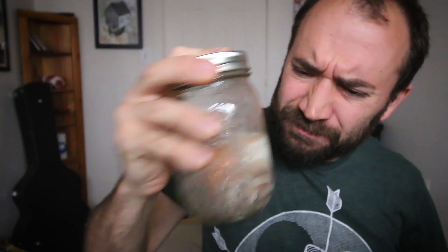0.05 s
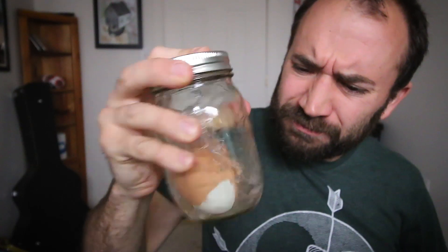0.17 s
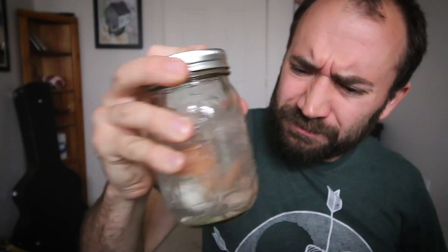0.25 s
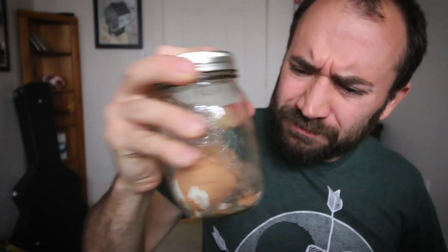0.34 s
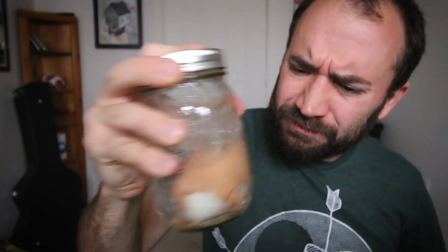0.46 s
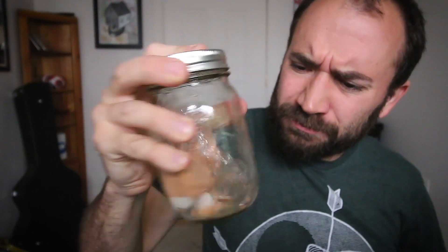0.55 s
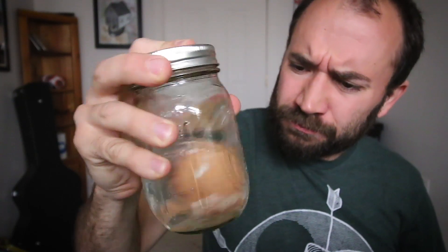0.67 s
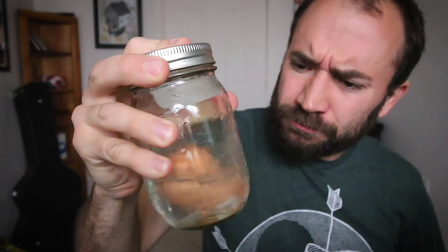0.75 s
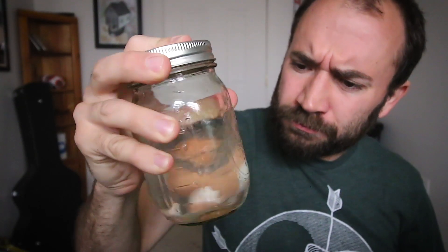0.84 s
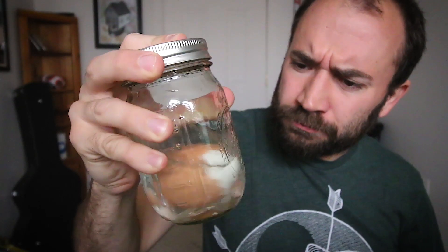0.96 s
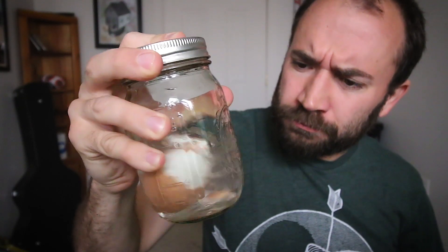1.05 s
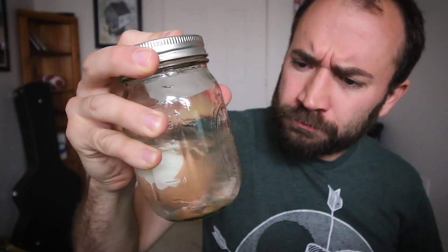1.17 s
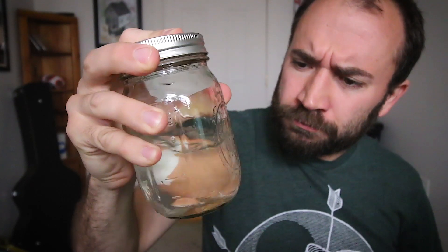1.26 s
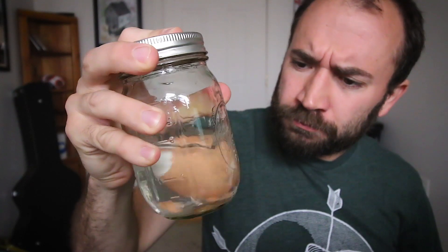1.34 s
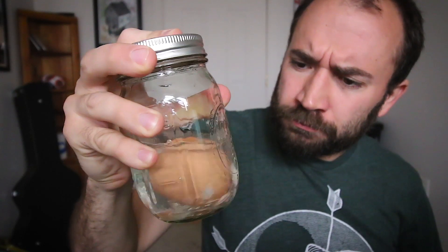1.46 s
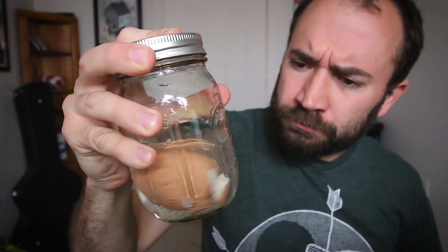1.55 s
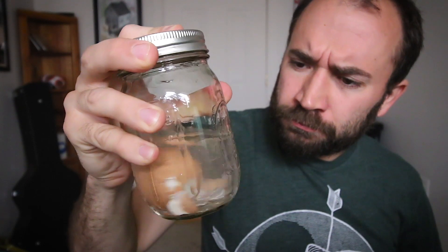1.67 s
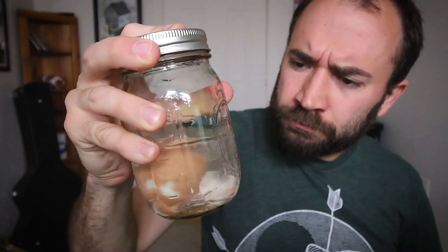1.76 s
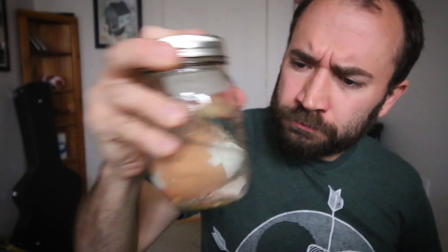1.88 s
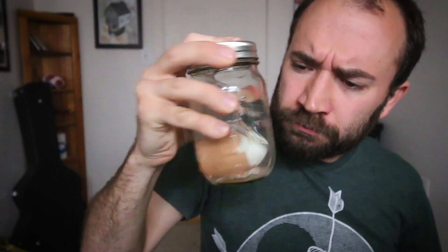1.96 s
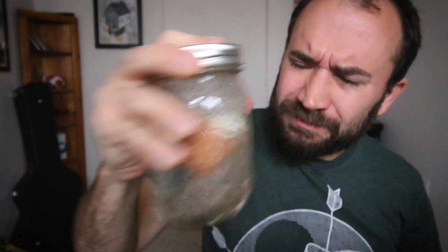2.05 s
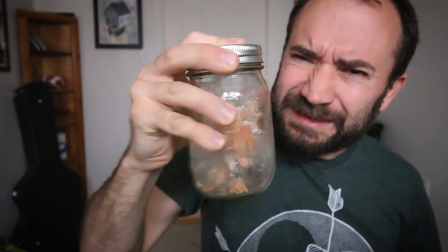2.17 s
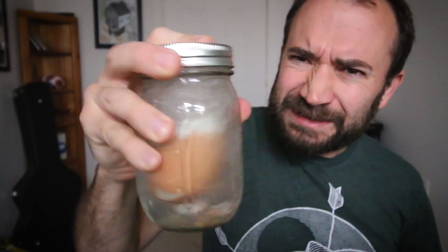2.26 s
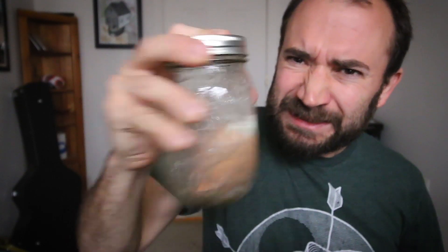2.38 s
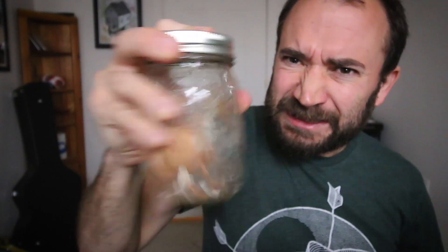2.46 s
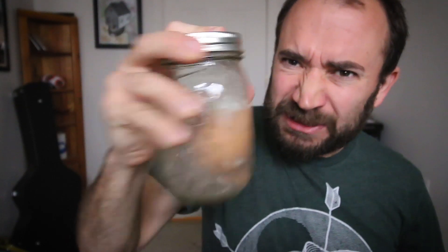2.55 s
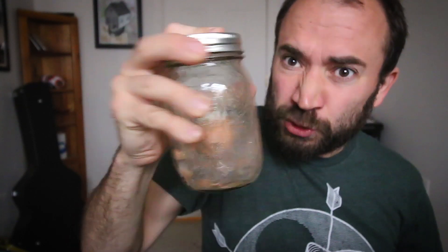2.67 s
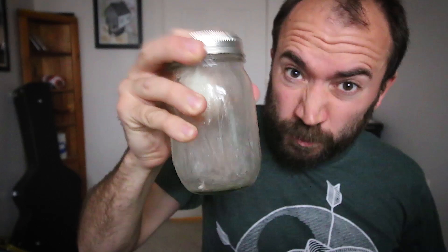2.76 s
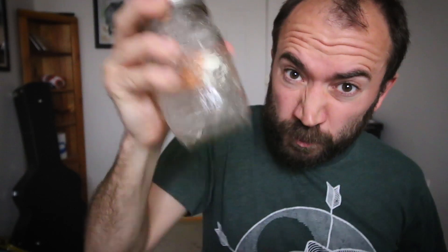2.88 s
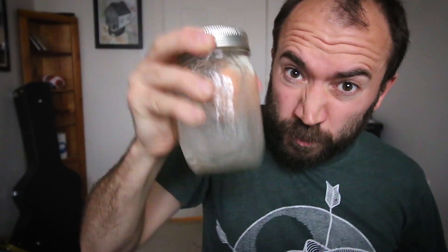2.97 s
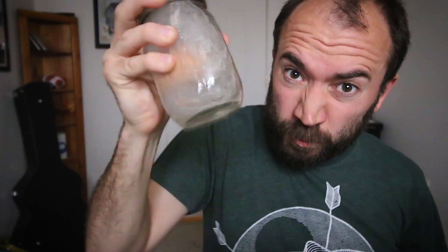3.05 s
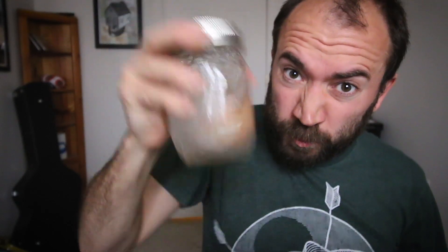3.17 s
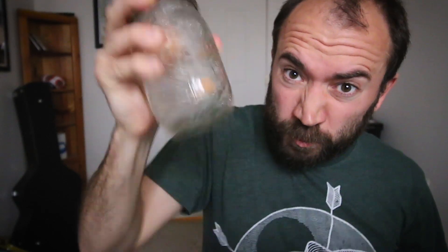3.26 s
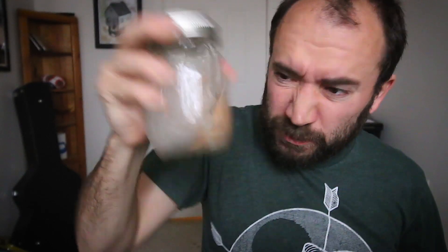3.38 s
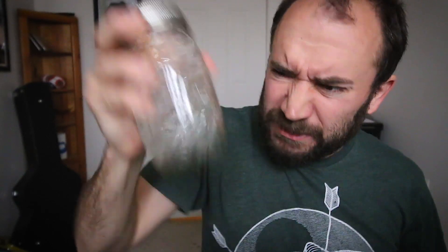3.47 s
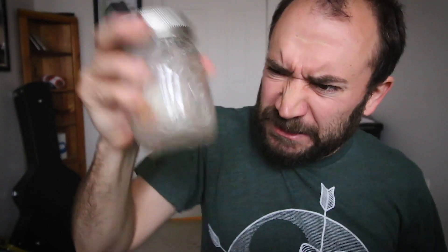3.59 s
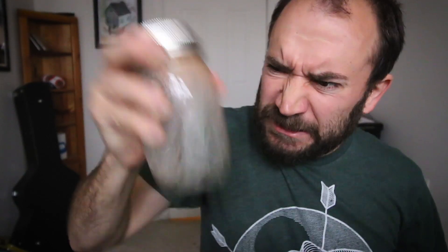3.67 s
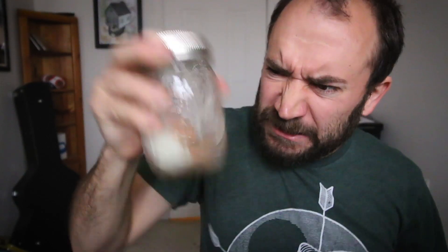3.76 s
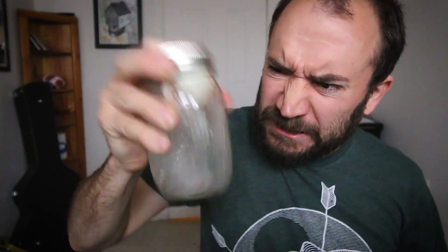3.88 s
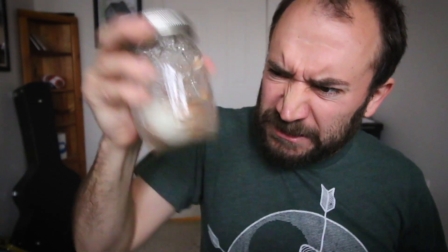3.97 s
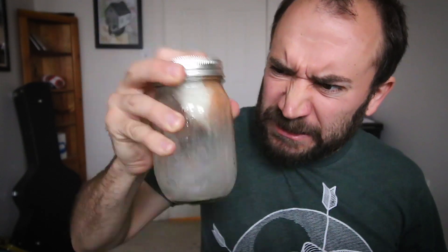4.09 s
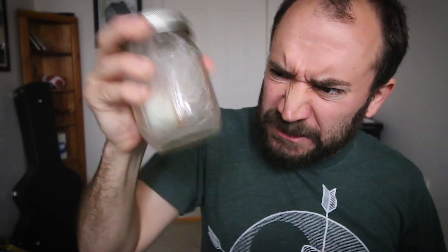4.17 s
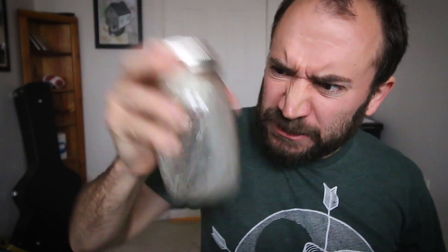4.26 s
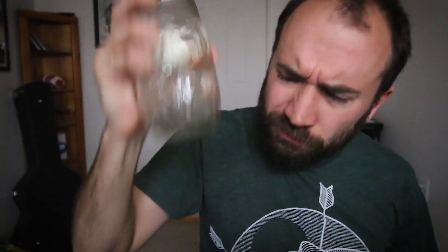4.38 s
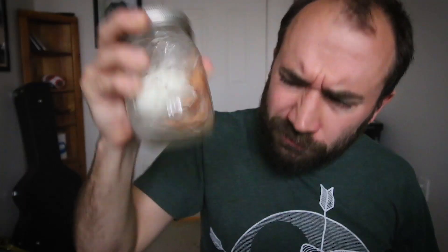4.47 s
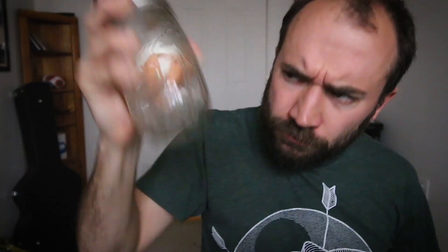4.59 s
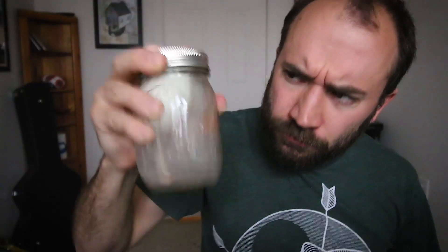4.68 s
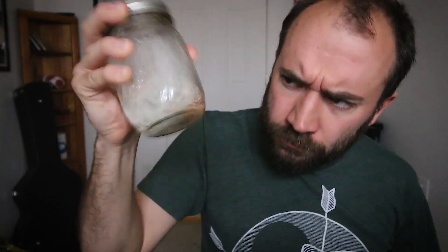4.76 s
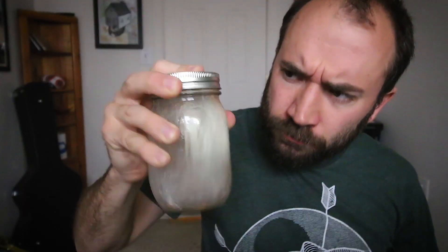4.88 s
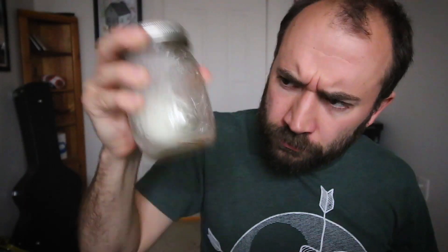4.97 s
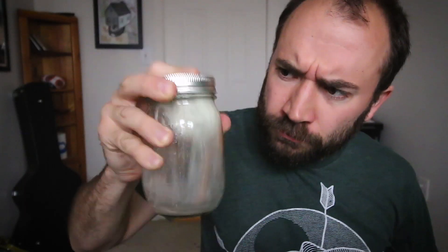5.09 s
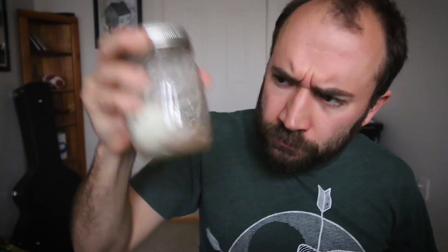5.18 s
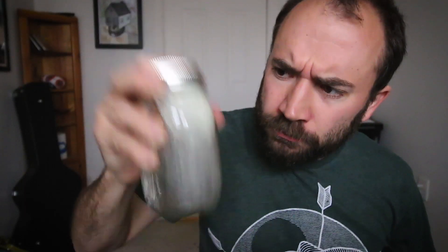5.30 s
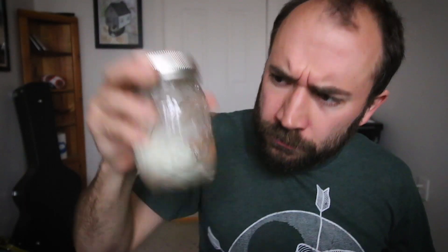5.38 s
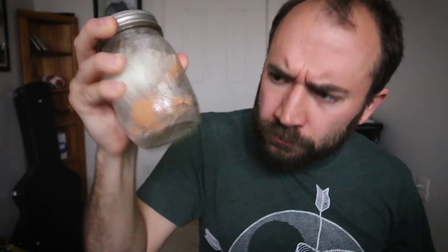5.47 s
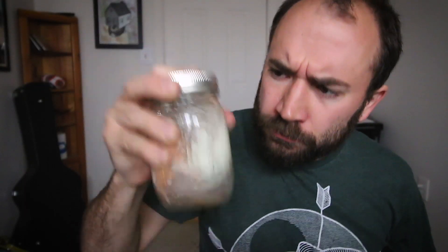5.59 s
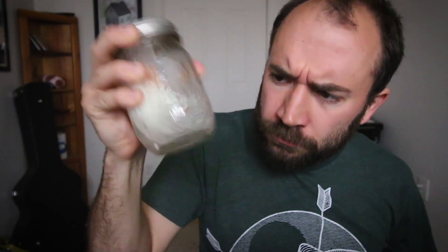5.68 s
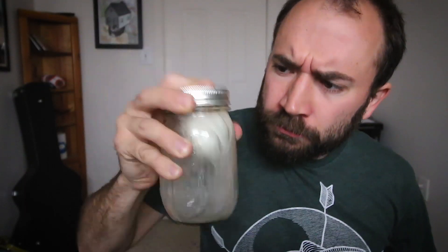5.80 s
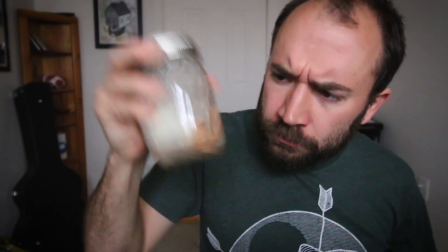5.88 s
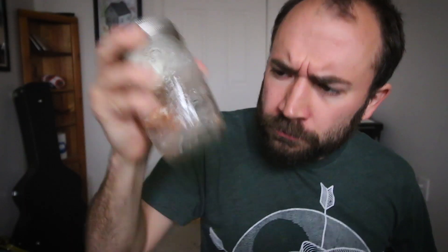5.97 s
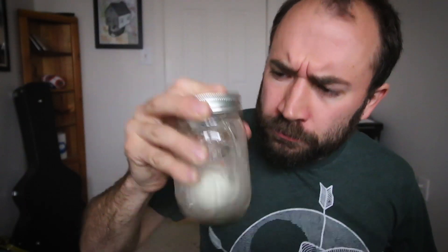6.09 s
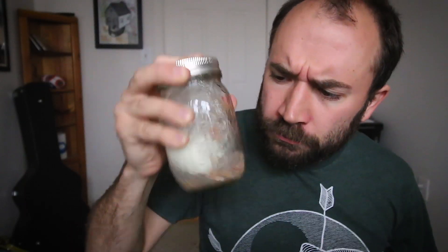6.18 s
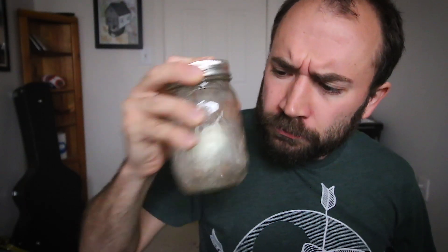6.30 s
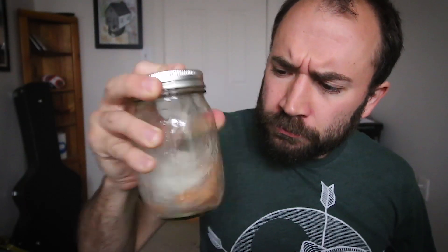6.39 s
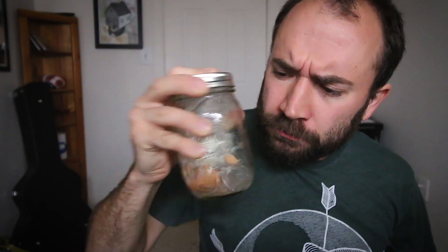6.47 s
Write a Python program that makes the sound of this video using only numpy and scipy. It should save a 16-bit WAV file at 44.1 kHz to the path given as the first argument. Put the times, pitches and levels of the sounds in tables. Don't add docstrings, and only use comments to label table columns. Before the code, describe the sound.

An egg and a little water swirl gently in a glass jar, pause with a few drips, then get shaken hard with wet slaps.

```python
import sys
import numpy as np
from scipy import signal
from scipy.fft import rfft, irfft, next_fast_len
from scipy.io import wavfile
from scipy.ndimage import uniform_filter1d

SR = 44100
rng = np.random.default_rng(int(sys.argv[2]) if len(sys.argv) > 2 else 0)


def elevation(decibels):
    levels = np.asarray(decibels, float)
    return 10 ** (levels / 20)


def store_wav(level_fs):
    pcm = np.round(np.clip(np.atleast_2d(level_fs), -1, 1) * 32767)
    wavfile.write(sys.argv[1], SR, pcm.T.astype(np.int16))


N = 288308
HARD_FROM_S = 2.0


def evened(x):
    return x / np.sqrt(np.mean(x ** 2) + 1e-20)


def read(points, hz):
    f, value = np.transpose(points)
    return np.interp(np.log(hz + 1), np.log(f + 1), value)


def add(mix, start_s, sound):
    part = mix[max(round(start_s * SR), 0):][:len(sound)]
    part += sound[:len(part)]


def colour(x, spectrum):
    size = next_fast_len(N)
    z = rfft(x, size)
    own = np.sqrt(uniform_filter1d(abs(z) ** 2, size=2000) + 1e-12)
    hz = np.arange(len(z)) * SR / size
    return evened(irfft(z / own * elevation(read(spectrum, hz)), size)[:N])


def ring(hz, t60, rise_s, glide=0.):
    t = np.arange(round(SR / 8)) / SR
    tone = np.sin(2 * np.pi * hz * t * (1 + glide * hz * t))
    return tone * elevation(-60 * t / t60) * (1 - np.exp(-t / rise_s))


def wobbly(t, smooth_s):
    size = round(smooth_s * SR)
    drift = uniform_filter1d(rng.standard_normal(len(t)), size)
    return 1 + evened(uniform_filter1d(drift, size))


def patchy(x, depth_db):
    z = signal.stft(x, nperseg=256)[2]
    patches = uniform_filter1d(rng.standard_normal(z.shape), size=4, axis=0)
    patches = evened(uniform_filter1d(patches, size=12, axis=1))
    return evened(signal.istft(z * elevation(depth_db * patches), nperseg=256)[1][:N])


def slosh():
    # hz, level_db (per Hz)
    shaken_spectrum = [(88, -37), (150, 0.5), (178, -9.5), (260, -7), (551, -8.5), (632, -1), (738, -3),
                       (1300, 0), (2210, -5.5), (2860, -0.5), (9000, -21.5), (11700, -51.5), (19800, -120)]
    # hz, level_db (per Hz)
    swirled_spectrum = [(180, -33.5), (300, -15.5), (685, -15), (1700, -1.5), (2570, -0.5), (2920, 9),
                        (3230, -5), (4060, 6.5), (4680, -11), (7270, -11), (9000, -33), (11700, -43),
                        (19800, -120)]
    # hz, level_db (per Hz)
    spray_spectrum = [(2940, -10.5), (5000, -5), (8330, -7), (9460, -14.5), (12200, -8.5), (16000, -15.5)]
    # hz, level_db (per Hz)
    rumble_spectrum = [(18, -40), (50, 6.5), (115, -4.5), (300, -18.5)]
    # time_s, level_db
    trickle = [(0, -56.5), (.7, -54), (.9, -66.5), (1.28, -70), (1.5, -86)]
    t = np.arange(N) / SR
    gentle, hard = t < HARD_FROM_S, t > HARD_FROM_S

    bubbles = droplets(low_hz=301.6, high_hz=7685, cycles=2.34, cling_s=0.0013,
                       per_s=2600, spread_db=3.5, wash=0.47)
    body = np.where(gentle, colour(bubbles, swirled_spectrum), colour(bubbles, shaken_spectrum))
    body = patchy(body, depth_db=2.5)
    spray = droplets(low_hz=6520, high_hz=14900, cycles=4.4, cling_s=0,
                     per_s=1400, spread_db=3.5, wash=0.32)
    crackle = droplets(low_hz=900, high_hz=5000, cycles=1.0, cling_s=0.000097,
                       per_s=800, spread_db=4.5, wash=0)
    crackle = np.where(gentle, colour(crackle, swirled_spectrum), colour(crackle, shaken_spectrum))
    body = evened(body + elevation(-3.5) * crackle)

    thrown = surge_gain()
    running = elevation(np.interp(t, *np.transpose(trickle), right=-99))
    deep = signal.filtfilt(*signal.butter(2, 1300, fs=SR), body)
    water = np.hypot(thrown, running) * (body - deep)
    water += np.hypot(surge_gain(gulp=1), running) * deep
    gulps = droplets(low_hz=300.6, high_hz=900, cycles=5.0, cling_s=0, per_s=70, spread_db=3.5, wash=0)
    water += elevation(-12.0) * hard * surge_gain(gulp=0.81) * gulps

    mist_gain = np.hypot(surge_gain(spray=0.83, steep=0.86), elevation(-1.5) * running)
    mist = mist_gain * patchy(colour(spray, spray_spectrum), depth_db=2.5)
    sway = uniform_filter1d(thrown, size=3000) * hard
    rumble = elevation(-13.5) * sway * colour(rng.standard_normal(N), rumble_spectrum)
    return water + mist + rumble


def droplets(low_hz, high_hz, cycles, cling_s, per_s, spread_db, wash):
    out, count = np.zeros(N), 28
    for hz in np.geomspace(low_hz, high_hz, count):
        turns = np.arange(round(SR / 40)) / SR * hz
        fade = np.exp(-turns / (cycles + cling_s * hz)) * (1 - np.exp(-turns / 0.47))
        grain = np.sin(2 * np.pi * turns * (1 + 0.0052 * turns)) * fade
        luck = rng.random(N) * count * SR / per_s
        size = (luck < 1) * np.clip(luck, .1, 1) ** (-spread_db * np.log(10) / 20)
        out += signal.oaconvolve(size, grain / np.linalg.norm(grain))[:N]
    return evened(out) + wash * rng.standard_normal(N)


def surge_gain(spray=0, gulp=0, steep=1):
    t, power = np.arange(0, N + 64, 32) / SR, 0
    for crest_s, db, spray_db, gulp_db, rise_ms, fall_ms in throws():
        rising, falling = (crest_s - t) / max(rise_ms, 1), (t - crest_s) / max(fall_ms, 1)
        halvings = np.where(t < crest_s, rising, falling) * 1000
        level_db = db + spray * spray_db + gulp * gulp_db - 7.23 * steep * halvings
        power = power + elevation(2 * level_db)
    return np.interp(np.arange(N) / SR, t, np.sqrt(power))


def throws():
    # crest_s, level_db, spray_db, gulp_db, fall_ms (per about 7 dB)
    swirls = [(0.003, -35, -4.5, 9, 39), (0.147, -44, -17, 13, -1), (0.21, -31.5, -7, 12.5, 23),
              (0.393, -51, -14, -20, 79), (0.493, -36, -10.5, -1, 20), (0.622, -32, -26, -18, 4),
              (0.699, -42.5, -4, -7.5, 29), (0.731, -47, -14, -14, 57), (0.784, -37, -3.5, 5, 28),
              (2.186, -26, -5, -22, 12), (2.356, -31, -6.5, -33, 31), (2.457, -33, -26, -12, 25),
              (6.312, -42, -24.5, -8, 33), (6.378, -37.5, -3.5, -18, 68)]
    # crest_s, level_db, rise_ms, fall_ms (per about 7 dB)
    lid_throws = [(2.112, -38, 1.5, 90), (2.289, -34.5, 42, 26), (2.598, -32, 59, 86),
                  (2.729, -31.5, 7, 23), (2.894, -32, 23, 20), (3.098, -31, 15, 10.5),
                  (3.277, -33.5, 24, 28), (3.469, -32, 19.5, 16), (3.667, -31, 22, 13),
                  (3.842, -32.5, 12, 30), (4.042, -28.5, 12, 10), (4.238, -34.5, 48, 71),
                  (4.577, -34.5, 7, 33), (4.803, -31.5, 24, 23.5), (5.022, -32, 17, 15),
                  (5.237, -33, 13, 28), (5.464, -33, 16.5, 43), (5.714, -33.5, 39, 28),
                  (5.946, -33, 15, 43), (6.128, -39, 47, 32), (6.179, -36, 7, 53)]
    # crest_s, level_db, rise_ms, fall_ms (per about 7
    # dB)
    base_throws = [(2.677, -36, 20, 55), (2.782, -29, 7, 35), (2.979, -27.5, 21, 35.5),
                   (3.177, -26, 23, 24), (3.351, -26.5, 18, 42), (3.557, -23.5, 16, 28),
                   (3.74, -27.5, 38.5, 31), (3.933, -26.5, 17, 29), (4.115, -25.5, 28, 27),
                   (4.32, -26, 6.5, 26), (4.43, -30.5, 26, 41), (4.484, -25.5, 14, 61),
                   (4.684, -32, 53, 44), (4.763, -39, 0, 4), (4.884, -27, 15, 41), (5.12, -31, 29, 32),
                   (5.344, -29.5, 35, 30), (5.589, -24.5, 6, 21), (5.809, -25, 11.5, 28.5),
                   (6.047, -22, 6, 17.5), (6.494, -33, 12, 56)]
    lid_spray_db, lid_gulp_db = -3, -0.5
    base_spray_db, base_gulp_db = -12.5, -6
    swirl_rise_ms = 7.1
    rows = [(s, db, spray, gulp, swirl_rise_ms, fall) for s, db, spray, gulp, fall in swirls]
    rows += [(s, db, lid_spray_db, lid_gulp_db, rise, fall) for s, db, rise, fall in lid_throws]
    rows += [(s, db, base_spray_db, base_gulp_db, rise, fall) for s, db, rise, fall in base_throws]
    return rows


def ticks():
    # start_s, peak_db, pitch_hz
    swirl_ticks = [(0.1433, -21.5, 5360), (0.208, -15, 3500), (0.2488, -17, 2900), (0.367, -22.5, 2720),
                   (0.447, -24.5, 2720), (0.468, -23, 2900), (0.49, -23, 1740), (0.599, -19, 3840),
                   (0.617, -21, 2870), (0.6677, -24, 3950), (0.697, -25, 3534), (0.7533, -33, 5000),
                   (0.78, -11.5, 2274)]
    # start_s, peak_db, pitch_hz
    clinks = [(0.016, -23, 877), (0.097, -14, 3510), (0.225, -23.5, 966), (0.343, -18, 3020),
              (0.3912, -15.5, 3970), (0.419, -43, 1440), (0.4288, -23, 3370), (0.526, -16, 3970),
              (0.641, -24.5, 4600), (6.3074, -18.5, 800), (6.308, -20, 1960)]
    # start_s, peak_db, pitch_hz, crack_db (treble)
    shell_ticks = [(2.119, -23, 980, -21), (2.1195, -18, 2440, -40), (2.181, -7.5, 5240, -39),
                   (2.264, -9, 3700, -20.5), (2.28, -16, 3040, -51), (2.528, -19, 2710, -23.5),
                   (2.589, -8, 4500, -18), (2.612, -10, 2900, -43), (2.69, -14, 2660, -28),
                   (2.724, -15.5, 3050, -39), (2.78, -15, 2780, -22), (2.818, -13.5, 2840, -29.5),
                   (3.07, -12.5, 2760, -22.5), (3.153, -8.5, 3250, -28), (3.249, -13.5, 3400, -23.5),
                   (3.536, -13, 3470, -23.5), (3.736, -11, 2930, -23), (3.9185, -17, 3460, -25),
                   (4.234, -19, 3260, -20.5), (4.318, -13, 3640, -43), (4.83, -16, 3120, -50),
                   (4.872, -15, 2990, -27), (5.005, -16, 2900, -27), (5.119, -12.5, 2820, -32),
                   (5.586, -16, 2500, -27), (5.798, -14, 3140, -36.5), (6.021, -11, 3320, -45),
                   (6.12, -19.5, 3500, -47.5), (6.361, -21, 3560, -34), (6.487, -18, 3000, -34)]
    # start_s, peak_db, pitch_hz
    pops = [(2.181, -8, 1365), (2.437, -20, 1790), (2.454, -19.5, 587), (2.889, -14.5, 704),
            (3.093, -15, 1020), (3.271, -14.5, 1550), (3.33, -10, 1469), (3.392, -17, 1880),
            (3.472, -15, 1130), (3.661, -13.5, 986), (3.706, -8, 1190), (3.827, -19, 1100),
            (3.931, -7, 1250), (4.02, -16, 806), (4.081, -19.5, 930), (4.292, -14.5, 797),
            (4.427, -18, 1090), (4.4766, -10.5, 1008), (4.569, -17.5, 1257), (5.082, -18, 1560),
            (5.229, -17.5, 900), (5.339, -9.5, 1550), (5.456, -10.5, 1650), (5.685, -16.5, 1350),
            (5.91, -17, 1860), (5.946, -14.5, 1150), (6.049, -8.5, 1260), (2.38, -30, 900),
            (2.4545, -17, 1520), (2.1835, -13, 3120)]
    # mode_hz, level_db, t60_s
    wall_modes = [(1487, -31, 0.013), (1793, 4, 0.015), (2900, -16, 0.04), (3380, 7.5, 0.013),
                  (3970, -5, 0.029), (5040, 11, 0.00606), (6750, -1.5, 0.01), (8060, 0, 0.015)]
    swirl_crack_db, clink_crack_db, pop_crack_db = -15.5, -28, -33.5
    sing_resting_db, sing_shaken_db, sing_t60_s = -22, -23, .1
    rows = [(s, db, hz, db + swirl_crack_db) for s, db, hz in swirl_ticks]
    rows += [(s, db, hz, db + clink_crack_db) for s, db, hz in clinks]
    rows += shell_ticks + [(*row, pop_crack_db) for row in pops]
    out, t = np.zeros(N), np.arange(round(SR / 8)) / SR
    treble = signal.butter(2, (4500, 13000), "band", fs=SR)
    spots = rng.standard_normal((len(rows), 2 * len(wall_modes)))
    for (s, db, hz, crack_db), spot in zip(rows, spots):
        gentle = s < HARD_FROM_S
        own = ring(hz, 0.0056 + 13 / hz, 0.00015, glide=0.0052)
        wall = 0
        for (f, mode_db, t60), a, b in zip(wall_modes, spot, spot[len(wall_modes):]):
            gain = elevation(mode_db + 1.6 * a - 3.1 * abs(np.log2(f / hz)))
            wall = wall + gain * ring(f * (1 + 0.032 * b), t60, 0.0034)
        chatter = 0.31 * rng.standard_normal(400) * np.exp(-np.arange(400) / SR / 0.0026)
        chatter[0] = 1
        body = signal.fftconvolve(own + elevation(-7.5) * wall, chatter / np.linalg.norm(chatter))[:len(t)]
        body *= 0.59 / abs(body).max()
        sing_db = sing_resting_db if gentle else sing_shaken_db
        body += elevation(sing_db) * ring(1.04 * hz, sing_t60_s, 0.0023) * wobbly(t, 0.0026)
        grit = rng.standard_normal(len(t))
        around = signal.butter(2, (0.67 * hz, min(1.26 * hz + 900, 16000)), "band", fs=SR)
        slap = signal.lfilter(*around, grit) * elevation(-60 * t / 0.007) * (1 - np.exp(-t / 0.00038))
        crack = signal.lfilter(*treble, grit) * elevation(-60 * t / 0.02) * (1 - np.exp(-t / 0.0029))
        strike = body + elevation(-6 if gentle else 0.6) * slap
        add(out, s, elevation(db - 3.0) * strike + elevation(crack_db + 7.5) * crack)
    return out


def bumps():
    # start_s, peak_db, pitch_hz
    landings = [(0.202, -28, 180), (0.21, -34, 330), (2.177, -19.5, 373), (2.448, -37, 547),
                (2.667, -27, 319), (3.152, -29, 535), (3.211, -30.5, 302), (3.267, -33, 303),
                (3.348, -27, 409), (3.391, -26.5, 299), (3.464, -30.5, 536), (3.551, -24, 405),
                (3.741, -18, 284), (3.926, -23.5, 300), (3.927, -28.5, 507), (4.13, -27, 282),
                (4.232, -28.5, 170), (4.317, -21.5, 261), (4.506, -30, 271), (4.573, -29.5, 478),
                (4.706, -31, 356), (4.801, -40, 490), (5.231, -29, 535), (5.599, -30, 330),
                (5.943, -31, 469), (6.049, -33, 304)]
    glug_db, glug_t60_s = -16.5, 0.13
    glug_sag = 5.4
    out, t = np.zeros(N), np.arange(round(SR / 8)) / SR
    for s, db, hz in landings:
        glug = np.sin(2 * np.pi * np.cumsum(hz * np.exp(-glug_sag * t)) / SR) * wobbly(t, 0.0023)
        glug *= elevation(glug_db - 60 * t / glug_t60_s) * (1 - np.exp(-t / 0.009))
        knock = ring(hz, 0.012, 0.00063, glide=-0.0046)
        add(out, s + 0.00299, elevation(db + 9.5) * (knock + glug))
    return out


def slaps():
    # start_s, peak_db, pitch_hz
    water_slaps = [(2.508, -33.5, 550), (2.546, -23.5, 1580), (2.596, -25.5, 1530), (2.725, -31, 880),
                   (2.782, -30, 1050), (2.951, -26.5, 1670), (3.152, -20.5, 1600), (3.177, -22, 1050),
                   (3.35, -24, 1540), (3.369, -24, 1337), (3.535, -29, 676), (3.551, -25, 1310),
                   (3.7415, -17, 1400), (3.84, -29, 1720), (3.905, -40, 1202), (4.036, -33, 2040),
                   (4.238, -31, 1060), (4.315, -20.5, 1570), (4.489, -30, 974), (4.516, -22.5, 1560),
                   (4.762, -34, 1250), (4.809, -37, 633), (4.874, -31, 1920), (5.119, -22, 2040),
                   (5.215, -41, 874), (5.245, -25.5, 1690), (5.305, -28, 628), (5.327, -23, 1500),
                   (5.588, -22, 1550), (5.805, -25, 1510), (5.974, -28, 1700), (6.021, -26, 1310),
                   (6.036, -29, 1500), (6.209, -32, 1220), (2.89, -21.5, 1600), (3.722, -32, 600),
                   (4.794, -31, 950), (4.986, -33, 600), (6.125, -32, 650), (6.146, -30, 1700),
                   (6.171, -33, 1200), (6.388, -40, 1390), (6.406, -39, 900), (6.448, -38, 1320),
                   (6.489, -32, 1160)]
    # start_s, peak_db, pitch_hz
    crumbs = [(2.1337, -25.5, 2470), (2.2914, -19.5, 3076), (2.3466, -28, 3160), (2.3585, -21.5, 5430),
              (2.3757, -25, 2900), (2.4694, -28, 3920), (2.5427, -25, 2800), (2.5686, -28, 3120),
              (2.578, -25, 4580), (2.6717, -31, 2740), (2.953, -38, 2930), (2.9736, -29, 3300),
              (3.3293, -24, 2845), (3.3505, -22, 2730), (3.467, -31, 3010), (3.5494, -20, 3260),
              (3.706, -22, 2900), (3.9255, -24, 3000), (4.0282, -38, 2930), (4.086, -33, 3080),
              (4.2926, -23.5, 2930), (4.5152, -24.5, 2830), (4.57, -35, 3030), (4.6768, -38, 2510),
              (4.704, -30, 3080), (4.7686, -27.5, 4930), (4.797, -25, 4870), (4.9182, -20.5, 3180),
              (4.9935, -38, 3000), (5.018, -27.5, 2950), (5.082, -30, 3200), (5.0985, -30, 3020),
              (5.3213, -26, 3090), (5.3406, -17, 3110), (5.456, -33, 2880), (5.4886, -27, 3080),
              (5.685, -38, 2960), (5.95, -35, 2720), (6.048, -15.5, 3595), (6.299, -31, 2960),
              (6.3591, -28.5, 3780)]
    # start_s, peak_db, pitch_hz
    pings = [(0.0044, -43, 5000), (0.087, -41, 7480), (0.1745, -35, 5460), (0.2358, -43, 5300),
             (0.3683, -31, 7300), (0.383, -39, 7990), (0.4473, -27, 5800), (0.469, -32, 7600),
             (0.4867, -25, 7000), (0.622, -32.5, 5290), (0.6817, -39, 5090), (0.716, -46, 7200),
             (0.7411, -33, 7000), (0.7537, -30, 8300), (0.7753, -22.5, 5200), (0.843, -37, 5360),
             (3.9185, -19, 6360)]
    out, t = np.zeros(N), np.arange(200) / SR
    kinds = ((water_slaps, 3, 9, .012), (crumbs, 2.5, 22, .002), (pings, 1.5, 35, .0005))
    for rows, lift_db, cycles, glide in kinds:
        for (s, db, hz), grit in zip(rows, rng.standard_normal((len(rows), 200))):
            chatter = 0.15 * grit * np.exp(-t / 0.0014) + (t == 0)
            tap = signal.fftconvolve(ring(hz, cycles / hz, 0.32 / hz, glide), chatter)[:2000]
            add(out, s, elevation(db + lift_db) * tap / abs(tap).max())
    return out


def snaps():
    # start_s, peak_db
    ruptures = [(0.149, -30), (0.181, -31), (0.19, -36), (0.236, -26.5), (0.2602, -31), (0.266, -25),
                (3.919, -22), (0.595, -29), (1.009, -42), (1.0395, -38.5), (1.208, -43), (1.847, -53),
                (2.01, -39), (2.1, -26), (2.123, -16), (2.355, -20), (2.4209, -23), (2.7257, -19),
                (3.3827, -22), (3.842, -19.5), (4.0403, -34), (4.0858, -20), (4.32, -19), (4.5988, -25),
                (5.575, -20), (5.5895, -20), (5.7639, -22), (5.7883, -24), (5.8056, -14), (6.0472, -28),
                (6.507, -29), (6.524, -21), (1.308, -49), (2.3333, -31), (2.556, -18.5), (2.589, -19),
                (2.783, -27), (2.896, -30), (3.101, -27.5), (3.329, -19), (3.4665, -19), (3.5342, -17.5),
                (3.658, -19), (4.1941, -24), (4.231, -26), (4.2405, -25), (4.2914, -36), (4.344, -29),
                (4.398, -28), (4.426, -20), (4.44, -25), (4.514, -25), (4.7893, -17), (5.7086, -22),
                (5.747, -25), (5.9235, -26)]
    out, t = np.zeros(N), np.arange(300) / SR
    bright = signal.butter(1, (6500, 15000), "band", fs=SR)
    for s, db in ruptures:
        noise = signal.lfilter(*bright, rng.standard_normal(300))
        add(out, s, elevation(db) * noise * elevation(-60 * abs(t - .001) / 0.003))
    return out


def thuds():
    # start_s, peak_db
    stops = [(0.191, -32.5), (0.775, -47), (2.162, -27.5), (2.254, -33.5), (2.525, -38), (2.872, -37),
             (3.088, -39.5), (0.01, -44), (4.03, -40), (3.253, -34.5), (3.451, -33), (3.636, -33),
             (3.725, -36), (3.829, -35), (3.924, -46.5), (4.219, -32), (4.3, -35.5), (4.416, -42),
             (4.555, -41), (4.794, -41), (4.998, -41), (5.219, -39.5), (5.447, -41), (5.588, -43),
             (5.698, -40), (5.944, -41), (6.173, -42)]
    thud_hz, spread = 79.3, 0.17
    out, t = np.zeros(N), np.arange(round(SR / 10)) / SR
    for (s, db), luck in zip(stops, rng.standard_normal(len(stops))):
        hz = thud_hz * (1 + spread * luck)
        push = np.sin(2 * np.pi * hz * (t - .022)) * np.exp(-((t - .024) / 0.0072) ** 2)
        add(out, s, elevation(db + 4.0) * push)
    return out


def hums():
    # start_s, peak_db, pitch_hz, t60_s
    wall_tones = [(0.101, -52, 4000, 0.125), (0.391, -43, 4020, 0.223), (.42, -49.5, 1457, 0.21),
                  (0.491, -39, 1764, 0.17), (.526, -50, 4247, 0.17), (0.615, -35, 2900, 0.053),
                  (.641, -39.5, 1540, 0.085), (0.694, -48, 3780, 0.216), (0.781, -40, 1750, 0.29),
                  (0.801, -48, 1006, 0.103), (1.285, -57, 4020, .1), (2.185, -25, 5500, 0.076),
                  (2.191, -29, 6300, .08), (5.252, -34, 1790, 0.13), (5.346, -32, 1560, .1)]
    out, t = np.zeros(N), np.arange(round(SR / 8)) / SR
    end = np.cos(np.pi / 2 * t / t[-1])
    for s, db, hz, t60 in wall_tones:
        add(out, s, elevation(db) * ring(hz, t60, 0.0021) * (.5 + 0.82 * wobbly(t, 0.0046)) * end)
    return out


def drips():
    # start_s, peak_db, pitch_hz
    drops = [
        (0.991, -40, 3530),
        (1.1352, -43, 3600),
        (1.209, -39, 2380),
        (1.246, -34.5, 1230),
        (1.277, -34.5, 3400),
        (1.82, -50, 3200),
        (2.0932, -24, 3850),
    ]
    out, t = np.zeros(N), np.arange(round(SR / 8)) / SR
    for s, db, hz in drops:
        grit = uniform_filter1d(rng.standard_normal(len(t)), size=4) * elevation(-60 * t / 0.0025)
        tick = ring(hz, 0.0057, .00008) + 0.52 * grit
        answer = ring(1.08 * hz, 0.089, 0.0024) * wobbly(t, 0.0023)
        add(out, s, elevation(db) * (tick + elevation(-22) * answer))
    return out


def chirps():
    # start_s, peak_db, low_hz, high_hz, length_ms
    whistles = [
        (3.466, -22, 658, 1250, 11.8),
        (4.757, -30, 470, 1290, 13.3),
        (5.211, -37, 696, 1710, 8),
        (5.304, -29, 552, 1300, 7.6),
    ]
    out = np.zeros(N)
    for s, db, low_hz, high_hz, ms in whistles:
        u = np.linspace(0, 1, round(ms * SR / 1000))
        turns = np.cumsum(low_hz * (high_hz / low_hz) ** u) / SR
        add(out, s, elevation(db) * np.sin(2 * np.pi * turns) * np.sin(np.pi * u))
    return out


def gurgle():
    tones_hz = [2190, 2900, 3560]
    # start_s, end_s
    span_s = (1.217, 1.24)
    level_db, clicks_per_s = -51, 800
    u = np.linspace(0, 1, round(np.ptp(span_s) * SR))
    luck = rng.random((len(u), 2))
    clicks = (luck[:, 0] < clicks_per_s / SR) * (.4 + luck[:, 1]) * np.sin(np.pi * u ** 1.1)
    tones = sum(ring(hz, .014, .0003) for hz in tones_hz)
    out = np.zeros(N)
    add(out, span_s[0], elevation(level_db) * signal.fftconvolve(clicks, tones))
    return out


def room(x):
    # hz, t60_s
    decay = [(200, 0.3), (3000, 0.41), (12000, 0.23)]
    taps = np.zeros(SR // 2)
    at = np.arange(200, SR // 2 - 20, 20)
    taps[at + rng.integers(0, 20, len(at))] = rng.choice([-1., 1.], len(at))
    hz, t, z = signal.stft(taps, SR, nperseg=256)
    tail = signal.istft(z * elevation(-60 * t / read(decay, hz)[:, None]), SR, nperseg=256)[1]
    return signal.fftconvolve(x, tail / np.linalg.norm(tail))[:N]


def room_tone():
    # hz, level_db (per Hz)
    air_spectrum = [(15, -55), (25, -13), (59, 0), (92, -9.5), (149, -2.5), (200, -7.5), (250, -4),
                    (335, -7), (439, -15), (796, -21), (1290, -23.5), (1440, -18), (2160, -29),
                    (16000, -37.5)]
    # pitch_hz, level_db (rms)
    appliances = [(241.5, -63), (276, -67), (158.6, -66.5)]
    air_db = -56
    t = np.arange(N) / SR
    wander = evened(uniform_filter1d(rng.standard_normal(N), size=6000))
    hum = 0
    for hz, db in appliances:
        hum = hum + np.sqrt(2) * elevation(db + 1.1 * wander) * np.sin(2 * np.pi * hz * t)
    return elevation(air_db + 0.3 * wander) * colour(rng.standard_normal(N), air_spectrum) + hum


def scene():
    jar = slosh() + ticks() + drips() + snaps() + bumps() + thuds()
    jar += slaps() + hums() + chirps() + gurgle()
    return (jar + elevation(-12.0) * room(jar) + room_tone())[None]


def band_limit(x):
    return signal.sosfilt(signal.butter(12, 16050, fs=SR, output="sos"), x)


def record(dry):
    heard = signal.lfilter(*signal.butter(1, 28, "high", fs=SR), dry)
    lowpass = signal.firwin(511, 15850, window=("kaiser", 8), fs=SR)
    limited = signal.oaconvolve(heard, lowpass[None], "same")
    return band_limit(limited)


dry = scene()
out = record(dry)
store_wav(out)
```